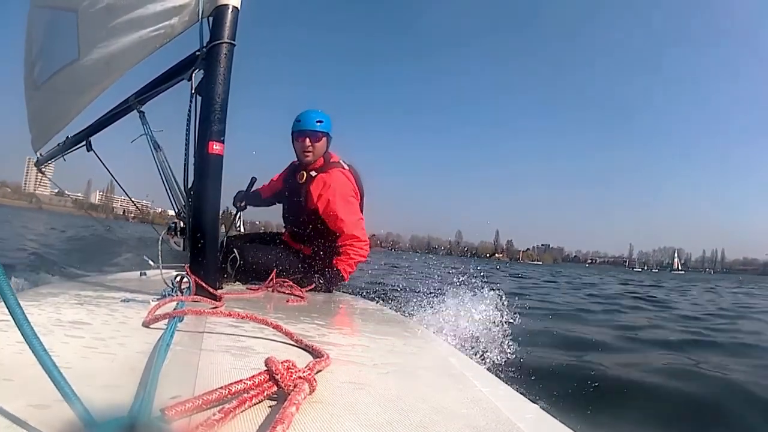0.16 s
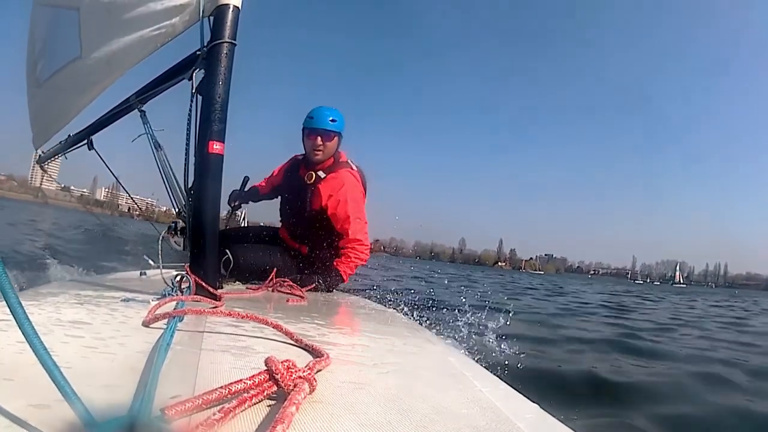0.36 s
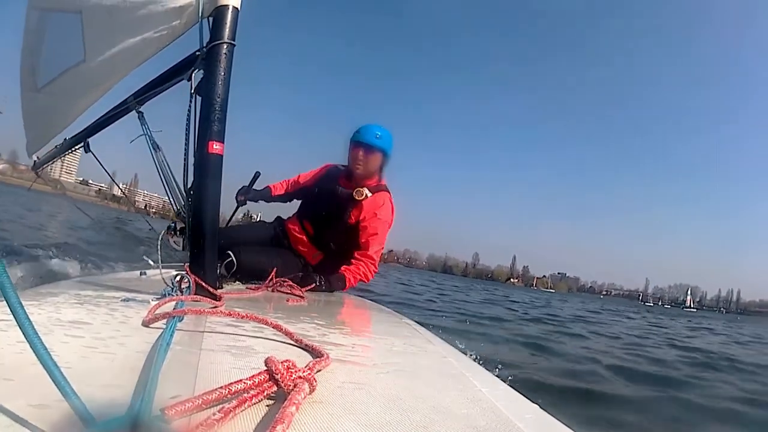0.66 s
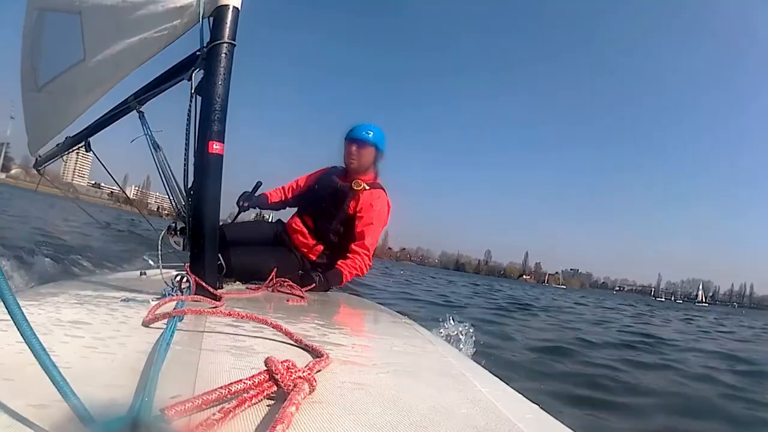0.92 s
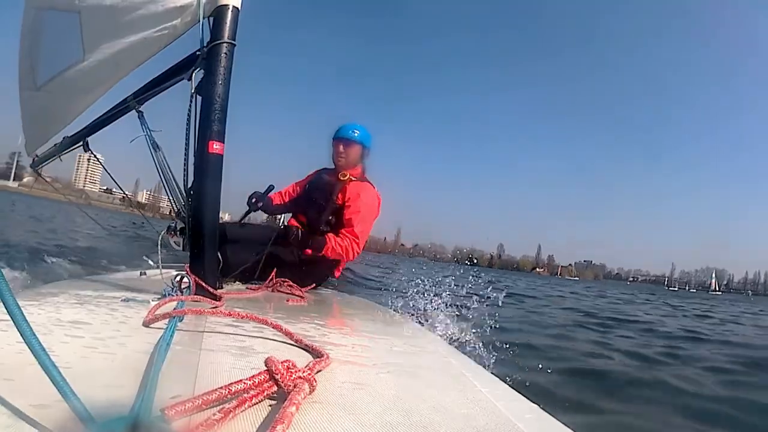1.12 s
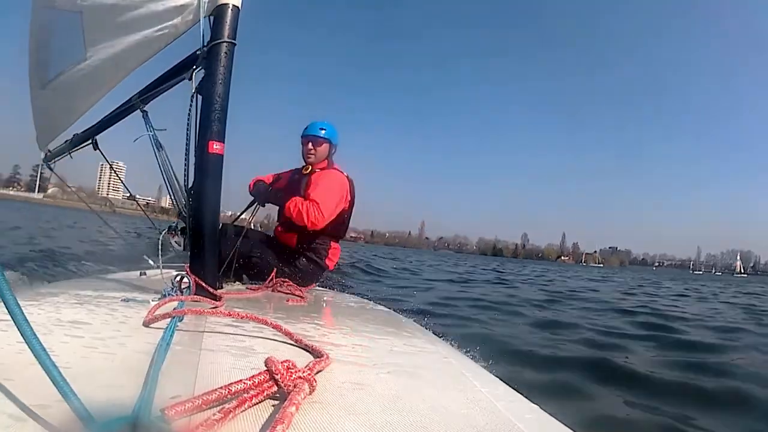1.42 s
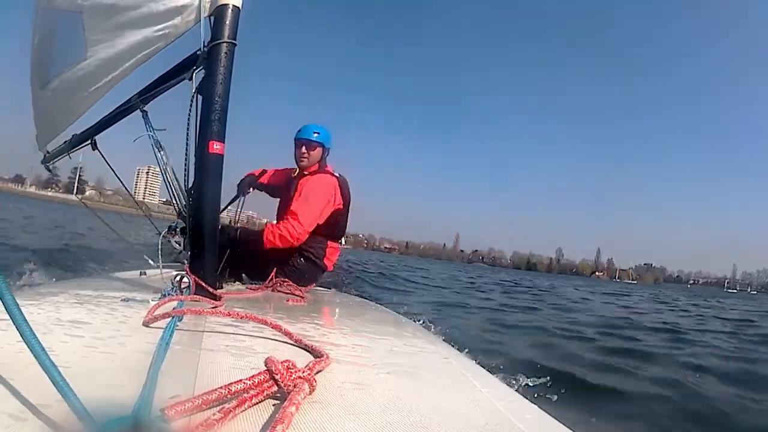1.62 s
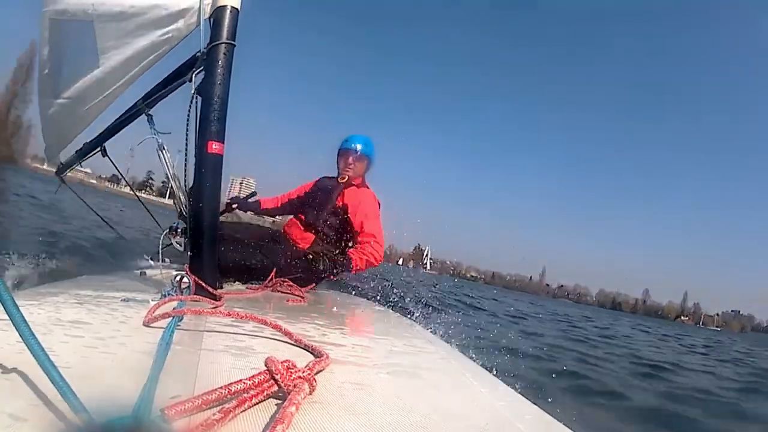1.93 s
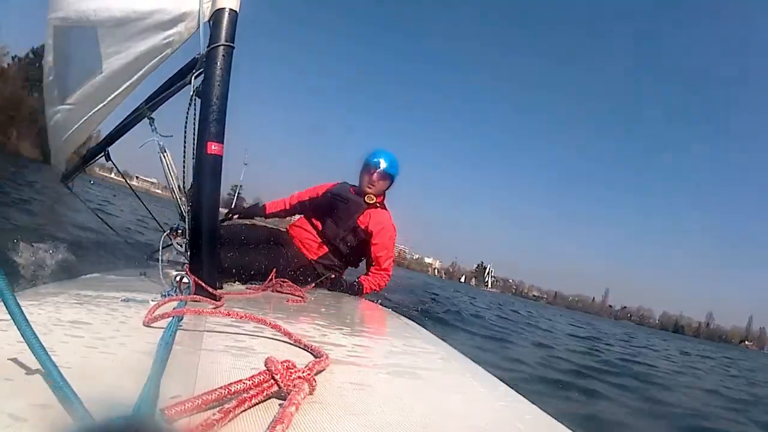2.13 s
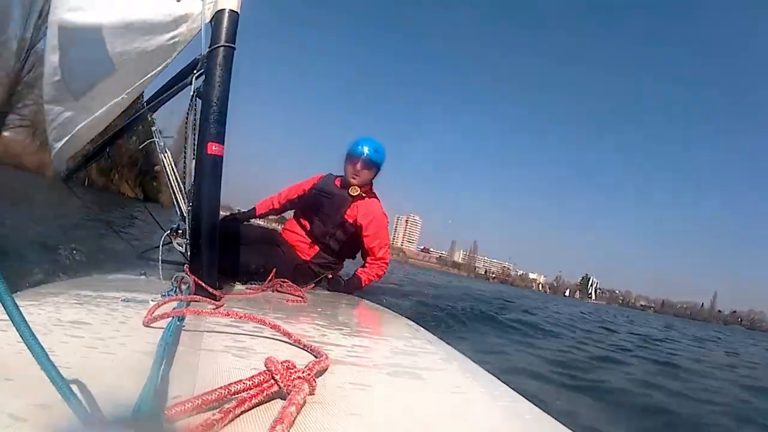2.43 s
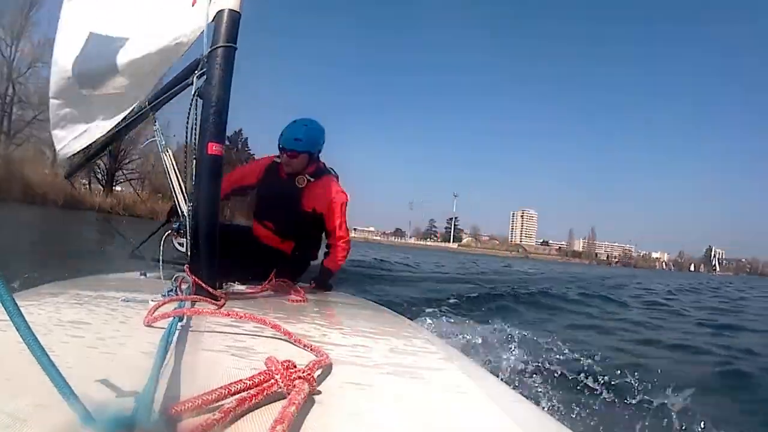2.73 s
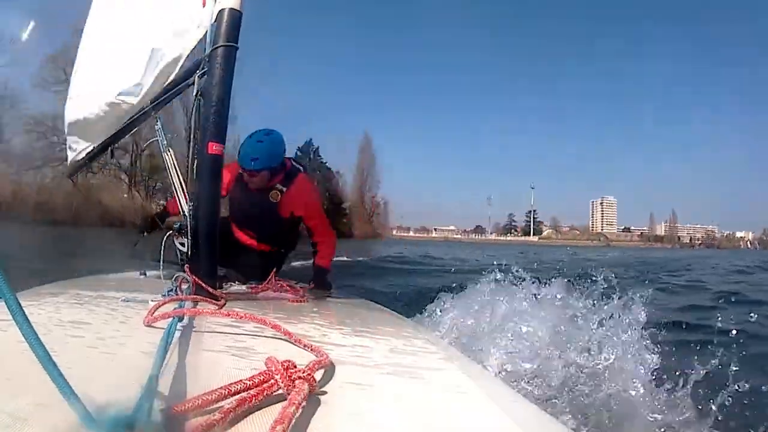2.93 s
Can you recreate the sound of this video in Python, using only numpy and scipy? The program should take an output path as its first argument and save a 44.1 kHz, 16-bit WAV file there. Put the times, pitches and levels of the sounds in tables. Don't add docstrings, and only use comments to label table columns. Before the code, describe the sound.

Water rushes and slaps a small planing sailboat hull, muffled, with one hard rig slam early on.

```python
import sys
import numpy as np
from scipy import signal
from scipy.io import wavfile
from scipy.ndimage import uniform_filter1d

SR = 44100
rng = np.random.default_rng(int(sys.argv[2]) if len(sys.argv) > 2 else 0)


def store_pcm(level_fs):
    pcm = np.round(np.clip(level_fs, -1, 1) * 32767).astype(np.int16)
    wavfile.write(sys.argv[1], SR, np.atleast_2d(pcm).T)


def invert_db(x):
    u = np.asarray(x, float) / 20
    return 10 ** u


N = 135387

# [t/s, spray level/dB, slosh re spray/dB, wind level/dB]
WATER_COURSE = [(0.0, -37, -0.5, -54.5), (.14, -37, 0.5, -57), (.3, -36, 0, -54.5), (.49, -31, -1.5, -51),
                (.7, -31.5, -2, -51.5), (.84, -34.5, 1, -51), (1.4, -37, 0, -55), (1.56, -36, -4.5, -53),
                (1.69, -35, 3.5, -54.5), (1.9, -31, 2, -51.5), (2.08, -40.5, -0.5, -55),
                (2.27, -39, 1, -55.5), (2.4, -33.5, 1.5, -55.5), (2.47, -41, 1.5, -56.5),
                (2.62, -34.5, 0.5, -54.5), (2.81, -38, 1.5, -56.5), (2.93, -28, -1, -52.5),
                (3.07, -38, 0, -56.5)]


def rms_one(x):
    return x / np.sqrt(np.mean(x ** 2) + 1e-20)


def in_time(rows):
    s, *columns = np.transpose(rows)
    return [np.interp(np.arange(N) / SR, s, c) for c in columns]


def drift(rate_hz):
    r = np.exp(-80 * np.pi * rate_hz / SR)
    slow = signal.lfilter([1], [1, -2 * r, r * r], rng.standard_normal(N // 40 + 2002))[2000:]
    return np.interp(np.arange(N) / 40, np.arange(len(slow)), rms_one(slow - slow.mean()))


def resonate(x, hz, width_hz):
    r = np.exp(-np.pi * width_hz / SR)
    zeros = np.array([1, 0, -1]) * (1 - r * r) / 2
    return signal.lfilter(zeros, [1, -2 * r * np.cos(2 * np.pi * hz / SR), r * r], x)


def resonate_twice(x, hz, width_hz):
    return resonate(resonate(x, hz, width_hz), hz, width_hz)


def steady(x, span_s):
    evenness = 0.58
    size = int(span_s * SR)
    power = uniform_filter1d(uniform_filter1d(x ** 2, size=size), size=size)
    return rms_one(x / (power + .02) ** (evenness / 2))


def flow(modes, patchy_db, rate_hz, grain_db, span_s):
    grains_per_s, grain_spread_db = 500, 6.5
    out, together = 0, drift(rate_hz)
    for hz, width_hz, db in modes:
        sizes = invert_db(grain_spread_db * np.minimum(rng.exponential(1, N), 4)) * rng.choice([-1, 1], N)
        grains = rms_one(sizes * (rng.random(N) < grains_per_s / SR / len(modes)))
        turbulence = rng.standard_normal(N)
        flicker = invert_db(patchy_db * (together + drift(rate_hz)))
        drive = (turbulence + invert_db(grain_db) * grains) * flicker
        run_up = drive[-SR // 4:]
        out = out + invert_db(db) * resonate_twice(np.r_[run_up, drive], hz, 1.42 * width_hz)[-N:]
    return steady(rms_one(out), span_s)


def taps(rows, trim_db, rise_s, centre_hz):
    partner_ratio, partner_db, rattle_db = 1.29, -9, -4
    out, t = np.zeros(N + SR), np.arange(SR // 8) / SR
    for s, db, hz, t25_s in rows:
        noise = rng.standard_normal(len(t))
        partner_hz = hz * partner_ratio ** np.sign(centre_hz - hz)
        partner_gain = invert_db(partner_db + 2.2 * noise[0])
        ring = np.sin(2 * np.pi * hz * t) + partner_gain * np.sin(2 * np.pi * partner_hz * t)
        ring = ring + invert_db(rattle_db) * rms_one(resonate_twice(noise, hz, 0.4 * hz))
        ring = ring * (1 - np.exp(-(t / rise_s) ** 2)) * invert_db(-25 * t / max(t25_s, .003))
        start = int(s * SR)
        out[start:start + len(t)] += invert_db(db + trim_db) * ring / np.abs(ring).max()
    return out[:N]


def wind():
    # [f/Hz, width/Hz, level/dB]
    seam_modes = [(2900, 340, -1.5), (3210, 410, 1), (3690, 150, -1.5), (4450, 830, -12), (4540, 220, -10)]
    wind_db = in_time(WATER_COURSE)[2]
    return invert_db(wind_db) * flow(seam_modes, patchy_db=1.8, rate_hz=10, grain_db=-17.5, span_s=0.25)


def spray():
    # [f/Hz, width/Hz, level/dB]
    case_modes = [(946, 88, -1.5), (1233, 220, -5), (1421, 180, -3), (1820, 210, -2.5), (2250, 320, -6.5),
                  (2490, 120, -18.5)]
    spray_db = in_time(WATER_COURSE)[0]
    return invert_db(spray_db - 1.5) * flow(case_modes, patchy_db=1.5, rate_hz=12.6, grain_db=-6.5, span_s=0.31)


def slosh():
    # [f/Hz, width/Hz, level/dB]
    deck_modes = [(265, 73, -2.5), (353, 87, 1), (463, 182, -11), (554, 200, -7), (778, 140, -10.5)]
    spray_db, slosh_db, _ = in_time(WATER_COURSE)
    level = invert_db(spray_db + slosh_db + 0.5)
    return level * flow(deck_modes, patchy_db=2.25, rate_hz=5, grain_db=-5.0, span_s=0.098)


def small_drops():
    # [t/s, peak/dB, f/Hz, time to fall 25 dB/s]
    drop_rows = [(.1436, -30.5, 914, .02), (.2653, -31.5, 1240, .015), (.288, -21, 1380, .015),
                 (.385, -25.5, 1820, .04), (.505, -24.5, 1470, 0.022), (.585, -26, 2340, 0.009),
                 (.698, -23.5, 2230, 0.017), (.749, -25, 1260, 0.017), (.8275, -25, 1305, 0.01),
                 (1.0136, -31.5, 1410, 0.013), (1.1238, -21.5, 1330, 0.0065), (1.282, -31, 1360, .015),
                 (1.3957, -27.5, 925, .02), (1.4636, -37, 1950, 0.0091), (1.5569, -22.5, 1803, 0.0073),
                 (1.6367, -23.5, 1464, 0.011), (1.6611, -22.5, 885, .025), (1.695, -21, 827, .025),
                 (1.7978, -28, 1015, 0.012), (1.8776, -23, 1216, 0.012), (2.2154, -25, 1445, 0.041),
                 (2.6394, -31, 1390, .015), (2.836, -27, 1890, 0.013), (2.985, -24.5, 1480, 0.024),
                 (.455, -30, 2900, 0.052), (.655, -33, 2940, .04), (1.152, -39.5, 3886, .02),
                 (1.775, -37, 3900, .02), (1.84, -36.5, 3890, .02), (2.155, -43.5, 3990, 0.015),
                 (2.4, -40.5, 3600, .03)]
    return taps(drop_rows, trim_db=-2.5, rise_s=0.0015, centre_hz=1600)


def deck_ticks():
    # [t/s, peak/dB, f/Hz, time to fall 25 dB/s]
    tick_rows = [(0.0982, -27.5, 1866, 0.02), (0.183, -23, 1890, 0.039), (0.2852, -20, 1864, 0.02),
                 (0.3256, -20, 1820, 0.02), (0.4227, -21.5, 1390, 0.015), (0.4783, -19, 1790, 0.017),
                 (0.5363, -28, 900, 0.022), (0.5601, -28, 2250, 0.012), (0.6588, -19, 963, 0.014),
                 (0.7138, -18, 1714, 0.022), (0.7856, -20, 985, 0.03), (0.857, -23.5, 1464, 0.025),
                 (0.9472, -28, 998, 0.017), (1.045, -22, 1426, 0.018), (1.1585, -15.5, 1316, 0.017),
                 (1.3361, -21.5, 1822, 0.0079), (1.6057, -23.5, 1258, 0.024), (1.6631, -22.5, 1478, 0.037),
                 (1.7275, -19.5, 1490, 0.01), (1.8173, -18.5, 1508, 0.017), (1.8906, -19, 1372, 0.048),
                 (1.9591, -24.5, 1390, 0.012), (2.023, -25.5, 1860, 0.02), (2.3195, -19.5, 920, 0.016),
                 (2.3618, -17, 1790, 0.02), (2.4051, -21, 1426, 0.035), (2.7095, -22, 1735, 0.02),
                 (2.8737, -25, 1713, 0.02), (2.8998, -15.5, 1430, 0.018), (2.9407, -18.5, 1783, 0.018)]
    # [t/s, peak/dB, f/Hz, time to fall 25 dB/s]
    splash_rows = [
        (.771, -21, 643, 0.08),
        (.8, -31, 594, 0.064),
        (1.34, -26, 2350, 0.022),
        (1.53, -42.5, 2965, 0.13),
        (1.56, -31, 2900, 0.086),
        (1.915, -18, 803, 0.052),
        (1.926, -27.5, 777, 0.12),
        (2.51, -34, 2920, 0.076),
        (2.512, -30.5, 2176, .03),
    ]
    return taps(tick_rows + splash_rows, trim_db=-2.5, rise_s=0.002, centre_hz=1600)


def side_laps():
    # [t/s, peak/dB, f/Hz, time to fall 25 dB/s]
    lap_rows = [(.186, -15, 326, .04), (.36, -14, 220.6, 0.094), (.796, -14, 471, .06),
                (.897, -13, 646, .05), (1.183, -18, 348, .04), (1.228, -22.5, 416, .04),
                (1.408, -14.5, 443, .05), (1.675, -16, 551, .06), (1.878, -9, 292, .04),
                (2.069, -23.5, 424, .04), (2.214, -17.5, 361, .05), (2.41, -16, 278.7, .04),
                (2.674, -16.5, 519, .06), (2.834, -22, 532, .03), (2.972, -11.5, 651, .035),
                (3.012, -17.5, 793, .03), (2.97, -6.5, 199.1, .1)]
    return taps(lap_rows, trim_db=-9.5, rise_s=0.008, centre_hz=400)


def bow_thuds():
    # [t/s, peak/dB, f/Hz, time to fall 25 dB/s]
    thud_rows = [(0.03, -32, 376, 0.045), (0.121, -17, 599, 0.048), (0.485, -8.5, 349, 0.028),
                 (0.774, -1.5, 332.4, 0.069), (0.924, -12, 353, 0.055), (1.082, -15, 389, 0.091),
                 (1.289, -18, 299, 0.048), (1.341, -18, 353, 0.026), (1.466, -16.5, 437, 0.056),
                 (1.737, -25, 382, 0.051), (1.902, -8, 380, 0.076), (2.322, -13.5, 368, 0.04),
                 (2.381, -21, 368.4, 0.05), (2.585, -15, 433, 0.042), (2.894, -11.5, 272.3, 0.11),
                 (2.977, -25.5, 340, 0.027)]
    return taps(thud_rows, trim_db=-9.5, rise_s=0.012, centre_hz=400)


def hull_heave():
    # [t/s, level/dB]
    heave_rows = [
        (0.0, -24.5),
        (0.61, -33.5),
        (1.03, -20.5),
        (1.29, -30.5),
        (1.68, -23.5),
        (2.25, -28),
        (2.92, -19.5),
        (3.07, -24),
    ]
    # [f/Hz, width/Hz, level/dB]
    bending_modes = [(30.65, 7.2, -4.5), (46, 10, -8)]
    level = invert_db(in_time(heave_rows)[0] + 2.5)
    return level * flow(bending_modes, patchy_db=2.5, rate_hz=3.9, grain_db=-32, span_s=0.055)


def panel_drumming():
    # [t/s, level/dB]
    drum_rows = [
        (0.0, -21.5),
        (0.14, -24),
        (0.69, -23.5),
        (0.87, -19.5),
        (1.48, -26.5),
        (1.68, -28),
        (1.88, -18.5),
        (2.28, -26.5),
        (3.07, -20),
    ]
    # [f/Hz, width/Hz, level/dB]
    panel_modes = [(84, 21, -4), (111.2, 37, -5.5), (130.5, 22.8, -3), (182.5, 34.8, -14)]
    level = invert_db(in_time(drum_rows)[0] + 2)
    return level * flow(panel_modes, patchy_db=2.0, rate_hz=6.4, grain_db=-5.5, span_s=0.041)


def shudders():
    # [t/s, length/s, level/dB, f/Hz]
    blow_rows = [(0.226, 0.018, -10.5, 140), (.266, 0.014, -10, 125), (.196, .016, -15.5, 100),
                 (2.262, .055, -17.5, 117.6), (1, 0.035, -22, 190), (0.6, 0.0054, -10.5, 51),
                 (3, 0.018, -9.5, 90), (.657, 0.015, -12, 140), (2.995, .035, -13.5, 110),
                 (0.833, 0.0266, -15.5, 121.5), (.925, 0.081, -11.5, 105.8), (0.94, 0.024, -19.5, 37),
                 (1.0, 0.035, -35, 129.3), (1.85, 0.3, -25, 142.4), (1.9361, 0.037, -3, 132.7),
                 (1.942, 0.027, -1.5, 44), (1.98, 0.11, -18.5, 134.5), (2.423, 0.043, -16, 95.5),
                 (2.608, 0.033, -10.5, 110), (2.634, 0.028, -14.5, 140.6), (1.66, 0.073, -21, 141.9),
                 (1.472, 0.11, -19, 31), (2.598, 0.087, -13, 33.4), (2.749, 0.038, -10.5, 32),
                 (2.973, 0.09, -8.5, 31.2)]
    # [t/s, length/s, level/dB, f/Hz]
    rig_rows = [
        (.7708, .0565, .5, 112),
        (.7976, .017, -7, 112),
    ]
    rise_cycles, fall_cycles = .3, .4
    out, t = np.zeros(N), np.arange(N) / SR
    waver = 1 + .025 * drift(42)
    for s, length_s, db, hz in blow_rows + rig_rows:
        cycles = hz * np.cumsum((t >= s) * waver) / SR
        swell = 1 - np.exp(-cycles / rise_cycles)
        damping = np.exp(-np.maximum(t - s - length_s, 0) * hz / fall_cycles)
        out += invert_db(db) * swell * damping * np.sin(2 * np.pi * cycles)
    return out


def scene():
    impacts = deck_ticks() + bow_thuds()
    hull = hull_heave() + panel_drumming() + shudders()
    water = spray() + slosh() + wind()
    light_impacts = small_drops() + side_laps()
    return (hull + water + impacts + light_impacts)[None]


def band_gate(x):
    # [f/Hz, level per line/dB]
    gate_rows = [(500, -85), (1600, -68), (2300, -70), (2700, -73), (3000, -80), (3500, -77), (3900, -79),
                 (4300, -88)]
    wobble_db, top_flutter_db, top_from_hz = 2.5, 3, 3300
    hz, _, lines = signal.stft(x, SR, nperseg=1792, noverlap=896)
    band = (hz // 150).astype(int)
    starts = np.flatnonzero(np.diff(band, prepend=-1))
    power = np.add.reduceat(np.abs(lines) ** 2, starts, axis=0) / np.bincount(band)[:, None]
    centre_hz = 150 * (np.arange(len(power)) + .5)
    gate_hz, gate_db = np.transpose(gate_rows)
    limit_db = np.interp(np.log(centre_hz), np.log(gate_hz), gate_db)[:, None]
    wobble = rms_one(uniform_filter1d(rng.standard_normal(power.shape), size=3, axis=1))
    limit_db = limit_db + wobble_db * wobble
    busy = np.log(power[:18].sum(axis=0) * power[7:18].sum(axis=0) ** 2 + 1e-30)
    chance = rms_one(uniform_filter1d(rng.standard_normal(power.shape[1]), size=3))
    flutter = .7 * chance - .7 * rms_one(busy - busy.mean())
    top_weight = 4 * np.clip(centre_hz / top_from_hz - 1, 0, .25)[:, None]
    limit_db = limit_db + top_flutter_db * top_weight * flutter
    kept = lines * (power > invert_db(2 * limit_db))[band]
    return signal.istft(kept, SR, nperseg=1792, noverlap=896)[1][:N]


def band_limit(x):
    return signal.sosfilt(signal.butter(12, 4330, fs=SR, output="sos"), x)


def record(dry):
    clip_top, hardness, ceiling = .75, 11, .71
    x = dry - 0.75 * resonate(dry, 2627, 260)
    x = x / (1 + np.abs(x / clip_top) ** hardness) ** (1 / hardness)
    top_cut = signal.cheby2(10, 60, 5240, fs=SR, output="sos")
    x = signal.sosfilt(top_cut, np.c_[x[:, 200:0:-1], x])[:, 200:]
    mix = np.clip(band_gate(x[0]), -ceiling, ceiling)[None]
    return band_limit(mix)


dry = scene()
out = record(dry)
store_pcm(out)
```